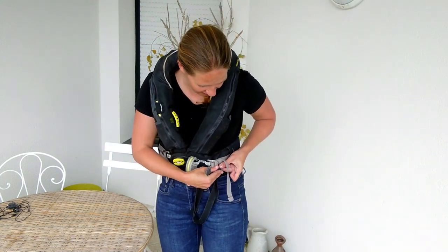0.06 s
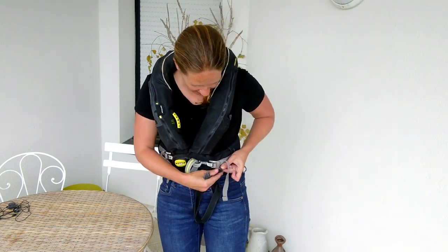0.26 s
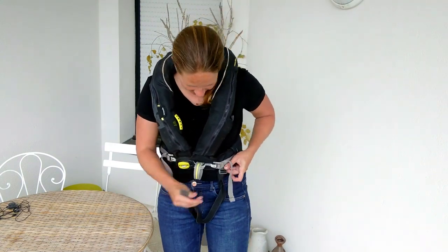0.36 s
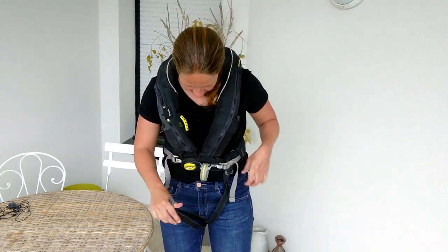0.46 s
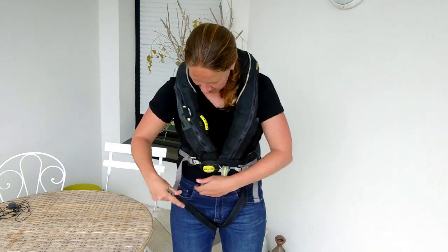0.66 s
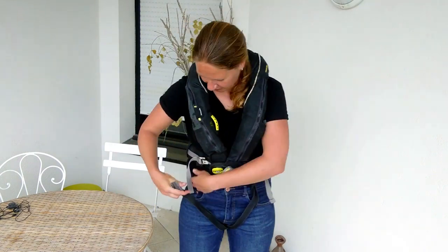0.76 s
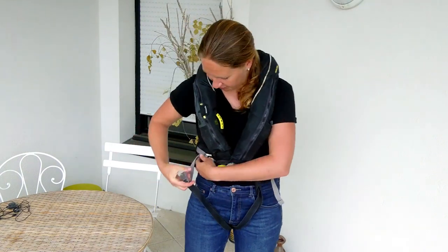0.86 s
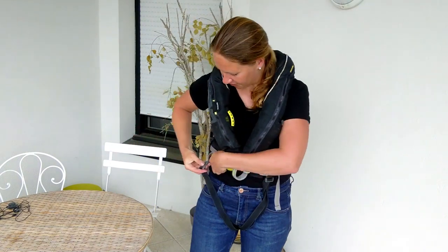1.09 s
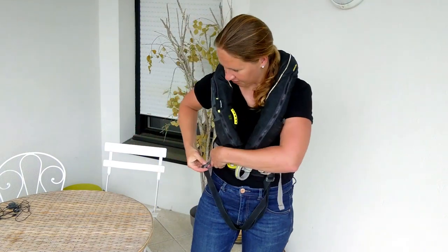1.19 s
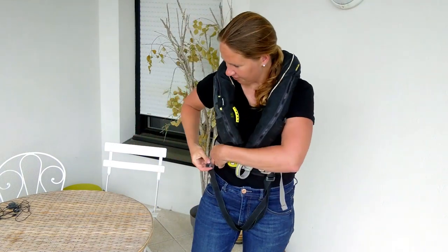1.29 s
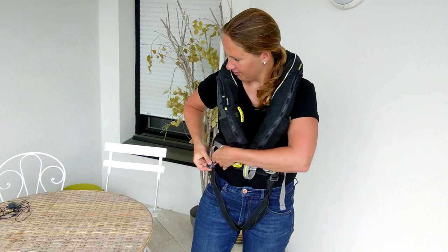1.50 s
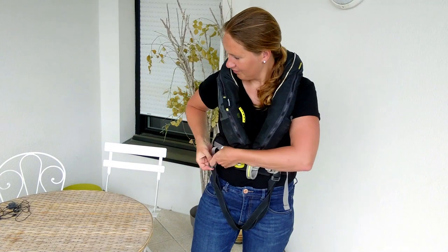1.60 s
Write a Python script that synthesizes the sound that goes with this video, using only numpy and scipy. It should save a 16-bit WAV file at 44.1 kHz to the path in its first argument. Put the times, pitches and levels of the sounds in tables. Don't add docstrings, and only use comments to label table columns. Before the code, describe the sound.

A plastic buckle clicks shut at 0.2 seconds: one sharp crack with a brief hollow ring and a short reverberant tail, after a faint tick at 0.14. A soft strap rub peaks near 0.4, knocks follow around 0.53, then from 0.85 to 1.65 webbing slides grainily with scattered small ticks and barely audible squeaks. Low distant traffic rumbles throughout; the small microphone sounds dull, a couple of metres away on a roofed terrace.

```python
import sys
import numpy as np
from scipy import signal
from scipy.fft import rfft, irfft, next_fast_len
from scipy.io import wavfile

SR = 44100
rng = np.random.default_rng(int(sys.argv[2]) if len(sys.argv) > 2 else 0)


def dump_mix(stems):
    frames = np.atleast_2d(stems).T
    limited = np.clip(frames, -1, 1)
    pcm = np.round(limited * 32767).astype(np.int16)
    wavfile.write(sys.argv[1], SR, pcm)


def ratio_of_db(decibels):
    return 10 ** (np.asarray(decibels, float) / 20)


N = 72765

# [t/s, level into prongs/dB, level into shell/dB, level of bare crack/dB]
SNAP = [
    (0.2065, -22.5, -31, -14),
    (0.2066, -8.5, -49, 6),
    (0.2074, -44, -11.5, -3),
]


def rms_one(x):
    return x / np.sqrt(np.mean(x ** 2) + 1e-20)


def at_hz(points, hz):
    table_hz, values = np.array(points)[:, 0], np.array(points)[:, 1]
    return np.interp(np.log(hz), np.log(table_hz), values)


def drift(rate_hz):
    r = np.exp(-80 * np.pi * rate_hz / SR)
    steps = rng.standard_normal(N // 40 + 2002)
    slow = signal.lfilter([1], [1, -2 * r, r * r], steps)[2000:]
    return np.interp(np.arange(N) / 40, np.arange(len(slow)), rms_one(slow))


def ring(x, hz, t60):
    r = ratio_of_db(-60 / (t60 * SR))
    w = 2 * np.pi * hz / SR
    return signal.lfilter([0, np.sin(w)], [1, -2 * r * np.cos(w), r * r], x + 1e-18)


def bands(low_hz, high_hz):
    edges = np.geomspace(low_hz, high_hz, int(3 * np.log2(high_hz / low_hz)) + 1)
    return [(signal.butter(2, [a, b], "band", fs=SR, output="sos"), np.sqrt(a * b))
            for a, b in zip(edges, edges[1:])]


def banded_noise(spectrum, patchy_db):
    # [f/Hz, likeness from 0 to 1]
    likeness = [(60, 0.91), (290, 0.83), (640, 0.23), (1410, 0.07), (3100, 0.16), (6820, 0.031)]
    out = 0
    white = rng.standard_normal((2, 2, N + 8000))
    for k, (sos, hz) in enumerate(bands(spectrum[0][0], spectrum[-1][0])):
        mid, side = signal.sosfilt(sos, white[k % 2])[:, 8000:]
        alike = np.clip(at_hz(likeness, hz), -1, 1)
        gain = ratio_of_db(at_hz(spectrum, hz) + patchy_db * drift(6))
        stereo = np.sqrt(1 + alike) * mid + np.sqrt(1 - alike) * side * [[1], [-1]]
        out = out + gain * stereo
    return rms_one(out)


def outdoors():
    # [f/Hz, level per Hz/dB]
    rumble_colour = [(12, -53.5), (20, -6.5), (187, -5), (367, -9), (421, -12), (584, -14.5), (1320, -23),
                     (1780, -24.5), (5200, -36), (6760, -81), (11400, -120)]
    drone_hz, drone_width_hz = 186.4, 16.2
    rumble = banded_noise(rumble_colour, patchy_db=2.5)
    drone = rms_one(ring(rng.standard_normal(N + 8000), drone_hz, 2.25 / drone_width_hz)[8000:])
    return ratio_of_db(-46.5) * rumble + ratio_of_db(-54.5) * drone


def ticks():
    # [t/s, peak level/dB, colour f/Hz, length/s, level of broadband edge/dB]
    knocks = [(.144, -36, 1010, .006, -9.5), (0.412, -43.5, 3520, 0.0072, -9), (0.493, -51, 4130, 0.036, 3),
              (0.534, -33.5, 1740, 0.0093, -8.5), (.542, -38.5, 1100, 0.0099, -11),
              (.654, -42.5, 960, 0.0073, -18), (0.811, -51.5, 3500, 0.0092, -6),
              (0.889, -46.5, 4100, 0.006, -14), (0.91, -43.5, 2640, 0.013, -8),
              (.95, -40.5, 3200, 0.0045, -7), (0.992, -38.5, 900, 0.0047, 5),
              (1.027, -38, 1410, 0.0041, 0.5), (1.051, -41, 1080, 0.0044, -15),
              (1.109, -48, 1300, 0.0097, -12), (1.179, -42.5, 4400, 0.0083, -26),
              (1.184, -35, 1260, 0.016, -17), (1.28, -33, 1500, 0.0047, -8), (1.296, -42, 900, .012, -15),
              (1.424, -52, 3980, 0.004, -5), (1.464, -38.5, 2500, 0.0037, -4.5),
              (1.485, -41.5, 2300, 0.007, -21), (1.554, -36, 2580, 0.0023, -18),
              (1.632, -42.5, 1950, 0.0069, -10)]
    relative_width, gain_db = 0.57, -2.5
    out = np.zeros(N + 3000)
    t = np.arange(3000) / SR
    edge_filter = signal.butter(2, [600, 6000], "band", fs=SR, output="sos")
    for s, db, hz, length, edge_db in knocks:
        burst = rng.standard_normal(3000) * np.exp(-t / length) * np.minimum(t / (length / 6), 1)
        burst[40] += 6 * np.exp(-length / 0.0056)
        body = ring(burst, hz, 1.7 / (relative_width * hz))
        edge = signal.sosfilt(edge_filter, burst)
        both = body / np.abs(body).max() + ratio_of_db(edge_db) * edge / np.abs(edge).max()
        start = int(s * SR)
        out[start:start + 3000] += ratio_of_db(db + gain_db) * both
    return out[:N]


def buckle():
    # [f/Hz, level/dB, t60/s]
    prong_modes = [(2730, -4, 0.0091), (3330, -1.5, 0.014), (3980, 2, 0.014), (4670, 7, 0.0048),
                   (5200, 2, 0.018)]
    # [f/Hz, level/dB, t60/s]
    shell_modes = [(557, -35, .012), (668, -6.5, 0.045), (1034, -2, 0.023), (1223, -1.5, 0.029),
                   (1637, -6, 0.024), (2033, 0.5, 0.016)]
    s, prong_db, shell_db, crack_db = np.transpose(SNAP)
    at = (s * SR).astype(int)
    prongs, shell, crack = np.zeros((3, N))
    prongs[at] = ratio_of_db(prong_db)
    shell[at] = ratio_of_db(shell_db)
    crack[at] = ratio_of_db(crack_db)
    out = signal.sosfilt(signal.butter(2, 4500, "high", fs=SR, output="sos"), crack + 1e-18)
    for k, (hz, db, t60) in enumerate(prong_modes):
        sign = (-1) ** (k + 1)
        out += sign * ratio_of_db(db - 7) * ring(prongs, hz, t60)
    for hz, db, t60 in shell_modes:
        out += ratio_of_db(db - 3.5) * ring(shell, hz, t60)
    return signal.sosfilt(signal.butter(2, 380, "high", fs=SR, output="sos"), out)


def webbing():
    # [t/s, level/dB]
    effort = [(0.0, -81), (0.206, -77), (0.362, -58.5), (0.408, -48.5), (0.596, -68), (0.854, -54),
              (1.102, -55.5), (1.36, -55), (1.65, -53.5)]
    # [f/Hz, level per Hz/dB]
    strap_colour = [(240, -29), (400, 1), (431, -10.5), (662, -2.5), (1840, -13), (4110, -19), (5200, -27),
                    (6760, -57), (11400, -120)]
    grains_per_s, grain_spread_db = 2500, 3.5
    sizes = ratio_of_db(grain_spread_db * np.minimum(rng.exponential(1, N), 5)) * rng.choice([-1, 1], N)
    slips = rng.random(N) < grains_per_s * ratio_of_db(3 * drift(15)) / SR
    grains = sizes * slips + 1e-18
    body = 0
    for sos, hz in bands(399.8, 5220):
        body = body + ratio_of_db(at_hz(strap_colour, hz)) * signal.sosfilt(sos, grains)
    top = signal.sosfilt(signal.butter(4, 5200, "high", fs=SR, output="sos"), grains)
    effort_db = np.interp(np.arange(N) / SR, *np.transpose(effort))
    return ratio_of_db(effort_db - 5.5) * (rms_one(body) + ratio_of_db(-12.5) * rms_one(top))


def squeaks():
    # [t/s, length/s, level/dB, f/Hz]
    drags = [
        (0.74, 0.02, -56, 7000),
        (0.891, .025, -52.5, 6940),
        (0.955, .015, -54, 6900),
        (1.02, 0.025, -57, 6900),
        (1.094, .02, -54.5, 6960),
    ]
    width_hz = 680
    out = np.zeros(N)
    t = np.arange(N) / SR
    noise = rng.standard_normal(N)
    for s, length, db, hz in drags:
        shape = np.clip((t - s) / 0.0047, 0, 1) * np.exp(-np.maximum(t - s, 0) / length)
        narrow = ring(ring(noise, hz, 2.0 / width_hz), hz, 2.5 / width_hz)
        out += ratio_of_db(db) * shape * rms_one(narrow)
    return out


def terrace(x):
    # [left delay/s, right delay/s, left level/dB, right level/dB]
    echoes = [(.0036, .0034, -8.5, -6.5), (.0043, 0.0045, -8.5, -5), (.0063, 0.0052, -13, -33),
              (.0098, 0.011, -12.5, -6.5)]
    response = np.zeros((2, 1000))
    response[:, 0] += 1
    for left_s, right_s, left_db, right_db in echoes:
        response[0, int(left_s * SR)] += ratio_of_db(left_db)
        response[1, int(right_s * SR)] += ratio_of_db(right_db)
    return signal.fftconvolve(x[None], response, axes=1)[:, :N]


def diffuse(colour):
    # [f/Hz, t60/s]
    decay = [(300, 0.37), (600, 0.41), (1200, 0.34), (2200, 0.37), (4000, 0.29), (7000, 0.34),
             (15000, 0.29)]
    # [f/Hz, level/dB, t60/s, bloom/s]
    standing_waves = [(540, -41.5, 0.12, 0.021), (565, -31, 0.12, 0.034), (1291, -56.5, 0.58, 0.015),
                      (1497, -47, 0.33, 0.012), (1597, -38, 0.2, 0.018), (1960, -42.5, 0.33, .03),
                      (3254, -51.5, 0.45, 0.035)]
    start_s, rise_s = 0.00067, 0.0056
    t = np.arange(SR // 2) / SR
    white = rng.standard_normal((2, 2, SR // 2))
    tail = 0
    for k, (sos, hz) in enumerate(bands(153.6, 19000)):
        fall_db = 60 * t / at_hz(decay, hz)
        tail = tail + ratio_of_db(at_hz(colour, hz) - fall_db) * signal.sosfilt(sos, white[k % 2])
    tail = tail * ratio_of_db(-24.5) * (1 - np.exp(-np.maximum(t - start_s, 0) / rise_s))
    for hz, db, t60, bloom in standing_waves:
        shape = ratio_of_db(at_hz(colour, hz) + db - 60 * t / t60) * (1 - np.exp(-(t / bloom) ** 2))
        phase = rng.uniform(0, 1, (2, 1))
        tail += shape * np.sin(2 * np.pi * hz * t + phase)
    return tail


def scene():
    # [f/Hz, level/dB]
    handling_tail = [(300, -13), (600, -3), (1200, -4.5), (2200, -3), (4000, -5.5), (7000, -5.5),
                     (15000, 6)]
    # [f/Hz, level/dB]
    snap_tail = [(200, -6), (400, 10), (600, 12.5), (2000, 14), (2800, 5.5), (5000, 9.5), (8000, 8),
                 (15000, 1.5)]
    handling = ticks() + webbing() + squeaks()
    out = terrace(buckle() + handling) + outdoors()
    out += signal.fftconvolve(handling[None], diffuse(handling_tail), axes=1)[:, :N]
    start = int(SNAP[1][0] * SR)
    out[:, start:start + SR // 2] += diffuse(snap_tail)
    return out


def band_limit(x):
    return signal.sosfilt(signal.butter(12, 16540, fs=SR, output="sos"), x)


def record(dry):
    # [f/Hz, level/dB]
    mic_response = [(4600, 0), (5050, -7.5), (5600, -28), (6400, -17.5), (8300, -29), (10500, -18),
                    (13000, -22.5), (15300, -13.5)]
    # [f/Hz, level per Hz/dB]
    hiss_colour = [(5300, -4), (6900, -1), (8300, -28.5), (10500, 3.5), (12000, -4), (15500, -9.5),
                   (18000, 1)]
    left_db, top_left_db = 1.5, -0.3
    size = next_fast_len(N + 4000)
    hz = np.maximum(np.arange(size // 2 + 1) * SR / size, 1)
    gain_db = at_hz(mic_response, hz) + top_left_db * (hz > 9000) * np.array([[1], [-1]])
    x = irfft(rfft(dry, size) * ratio_of_db(gain_db), size)[:, :N]
    x = x + ratio_of_db(-82) * banded_noise(hiss_colour, patchy_db=-2.5)
    x = x * ratio_of_db(np.array([[left_db], [-left_db]]))
    return band_limit(x)


dry = scene()
out = record(dry)
dump_mix(out)
```